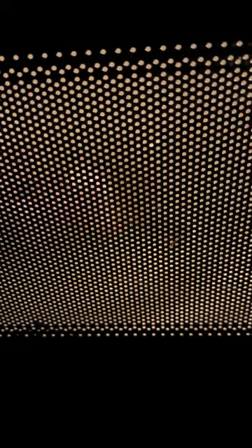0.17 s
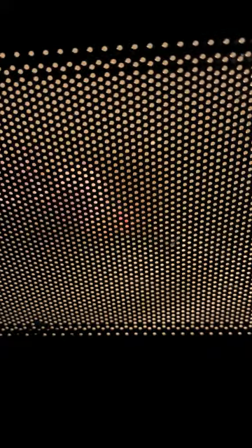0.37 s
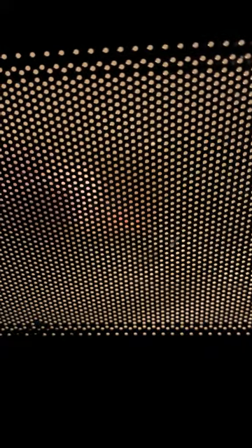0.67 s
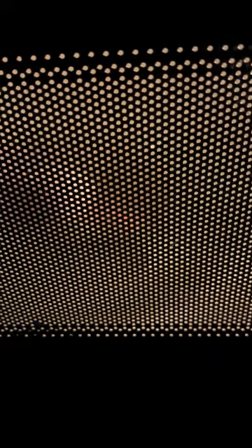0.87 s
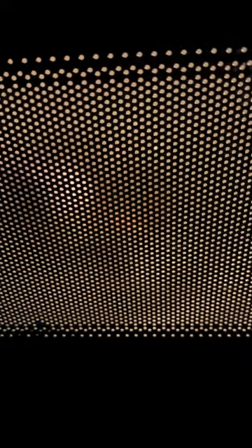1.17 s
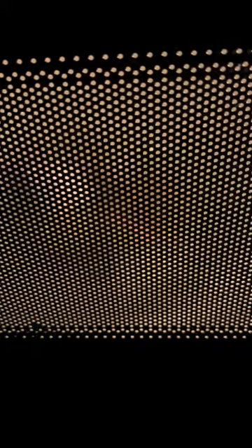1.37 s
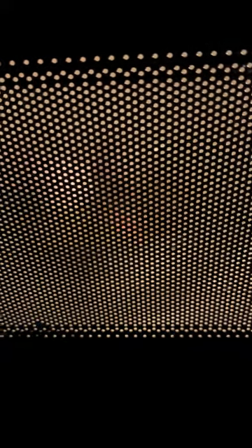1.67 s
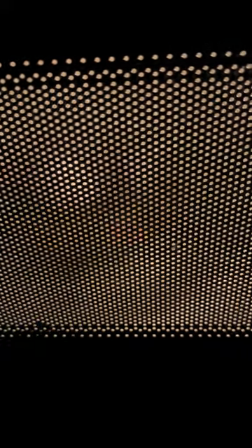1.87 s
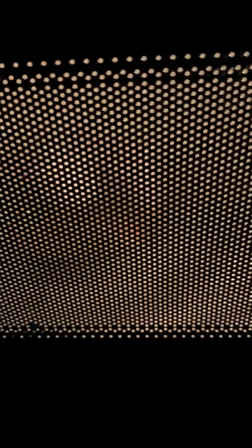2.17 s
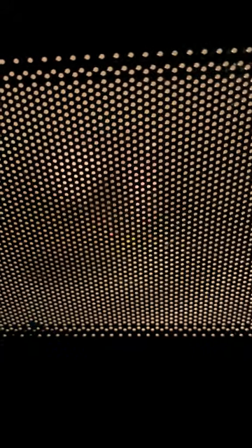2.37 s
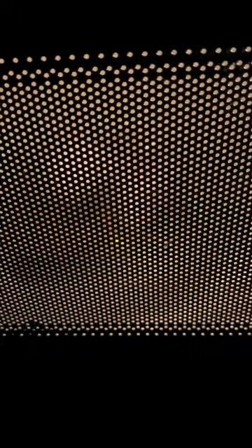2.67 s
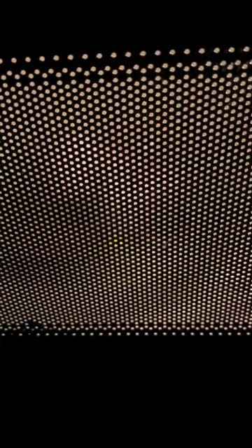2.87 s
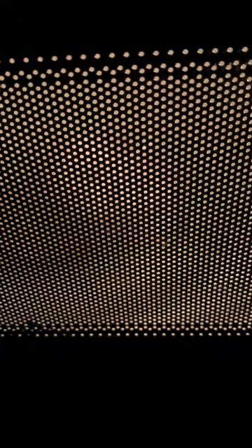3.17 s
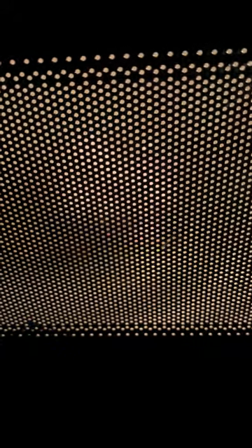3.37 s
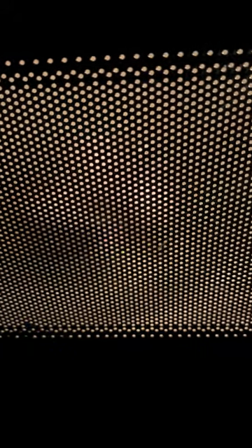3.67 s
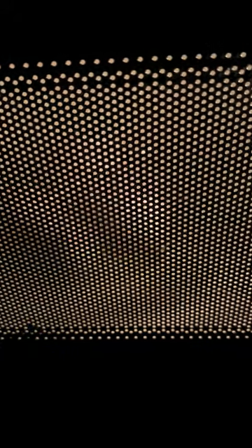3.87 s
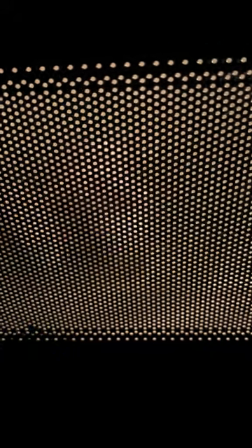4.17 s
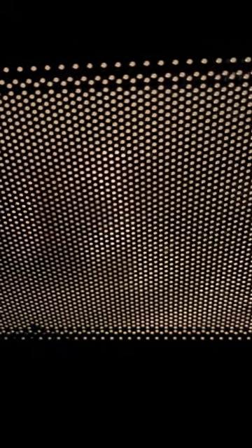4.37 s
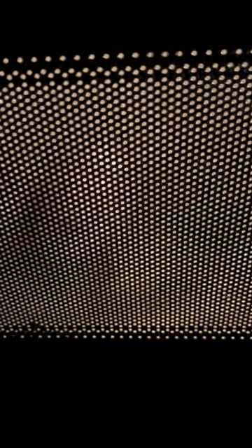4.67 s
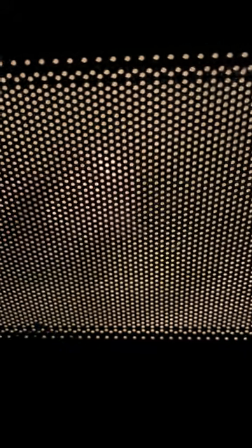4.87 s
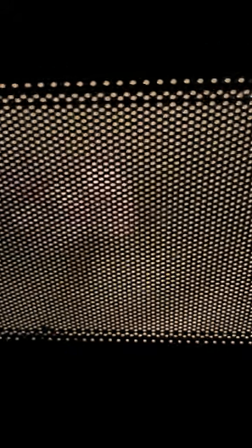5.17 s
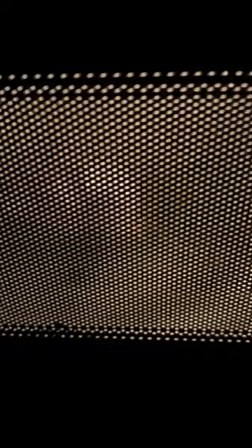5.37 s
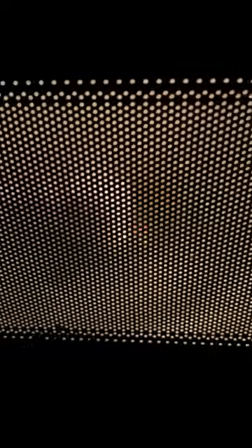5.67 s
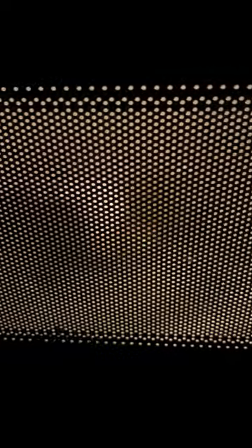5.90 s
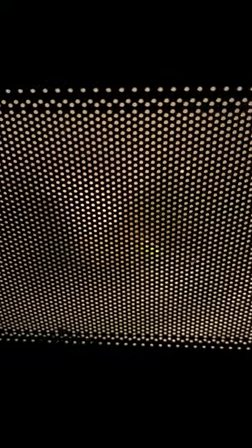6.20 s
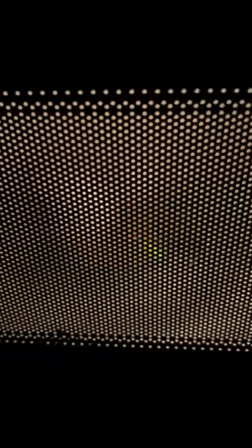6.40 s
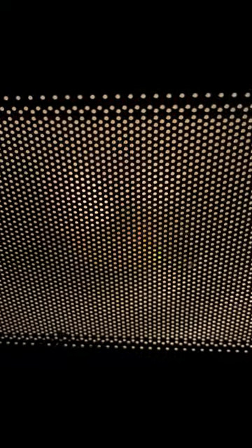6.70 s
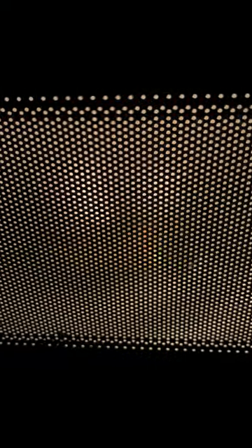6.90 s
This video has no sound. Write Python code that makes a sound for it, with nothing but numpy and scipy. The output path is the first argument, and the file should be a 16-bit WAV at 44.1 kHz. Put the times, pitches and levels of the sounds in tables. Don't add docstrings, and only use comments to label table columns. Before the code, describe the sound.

Close to a running microwave: low electrical hum that slowly grows, rushing fan air, scattered crackling pops from the food and faint dish ticks.

```python
import sys
import numpy as np
from scipy import signal
from scipy.fft import rfft, irfft
from scipy.io import wavfile
from scipy.ndimage import uniform_filter1d

SR = 44100
rng = np.random.default_rng(int(sys.argv[2]) if len(sys.argv) > 2 else 0)


def pcm_store(signal):
    levels = np.round(np.clip(np.atleast_2d(signal), -1, 1) * 32767)
    wavfile.write(sys.argv[1], SR, levels.astype(np.int16).T)


def voltage_ratio(decibels):
    exponent = np.asarray(decibels, float) / 20
    return 10 ** exponent


N = 310464
MAINS_HZ = 59.977


def curve(table, col=1):
    rows = np.array(table)
    return np.interp(np.arange(N) / SR, rows[:, 0], rows[:, col])


def along(table, hz):
    rows = np.array(table)
    return np.interp(np.log(hz + 1), np.log(rows[:, 0] + 1), rows[:, 1])


def walk(rate):
    hold = int(SR / rate)
    steps = np.repeat(rng.standard_normal(N // hold + 1), hold)
    return 1.3 * uniform_filter1d(uniform_filter1d(steps, hold), hold)[:N]


def colour(x, gain_db):
    size = x.shape[-1]
    return irfft(rfft(x) * voltage_ratio(gain_db(np.fft.rfftfreq(size, 1 / SR))), size)


def coloured_noise(table):
    x = colour(rng.standard_normal(N), lambda hz: along(table, hz))
    return x / np.sqrt(np.mean(x ** 2))


def tone(hz, level_db, pan_db=0, start=None):
    if start is None:
        start = rng.random()
    turns = np.cumsum(hz * np.ones(N)) / SR + start
    sides = voltage_ratio(np.array([[pan_db], [-pan_db]]) / 2)
    return np.sqrt(2) * np.sin(2 * np.pi * turns) * voltage_ratio(level_db) * sides


def swell(s, length, attack, release):
    t = np.arange(N) / SR - s
    return np.clip(t / attack, 0, 1) ** 2 * np.exp(-np.clip(t - length, 0, None) / release)


def flutter(level_db, lulls):
    t = np.arange(N) / SR
    half_width_s = .18
    dips = sum(db * np.exp(-2 * ((t - s) / half_width_s) ** 2) for s, db in lulls)
    return level_db + 1.5 * walk(6) - dips


# multiple of the mains, level in dB, left minus right in dB.
HUM = [(1, -55, 0), (7, -62, 6), (8, -49, 0), (12, -74, -6), (14, -63, 2), (15, -67, -5), (16, -66, -6),
       (17, -74, -5), (20, -68, -1), (21, -73, -1), (23, -67, -2), (25, -73, 2), (27, -72, -2),
       (28, -68, 0), (29, -72, -3), (30, -69, -1), (31, -80, -2), (34, -80, -5), (51, -81, 1)]
# time in seconds, level in dB.
PANEL_SHAKE = [(0, -50), (.4, -43.5), (1, -39), (2.2, -36), (3.2, -33.5), (4.7, -33.5), (6.2, -30.5),
               (7.04, -30)]
COUPLED = {2: (-48, -8), 4: (-64.5, -19)}
# time in seconds, depth in dB.
SIXTH_LULLS = [
    (0, 5.5),
    (2.12, 5),
    (4.3, 7),
    (5.12, 11.5),
    (5.76, 7),
]


def transformer():
    shake_db = curve(PANEL_SHAKE)
    levels = {3: shake_db, 6: flutter(-45.5, SIXTH_LULLS)}
    for k, (own_db, share_db) in COUPLED.items():
        levels[k] = 20 * np.log10(voltage_ratio(own_db) + voltage_ratio(shake_db + share_db))
    panel = sum(tone(k * MAINS_HZ, db, start=.22 * k + .6) for k, db in levels.items())
    hum = sum(tone(k * MAINS_HZ, db + 0.53 * walk(3.3), pan) for k, db, pan in HUM)
    buzz = sum(tone(k * MAINS_HZ, -84 - .2 * (k - 35) + 3.0 * rng.standard_normal()) for k in range(35, 80))
    return hum + panel + buzz


# time in seconds, turns a second.
SHAFT = [(0, 29.03), (.6, 29.13), (1.6, 29.09), (2.8, 29.04), (3.7, 29.06), (4.4, 29.16), (4.6, 29.12),
         (5.1, 29.19), (5.5, 29.07), (6, 29.24), (6.8, 29.19), (7.04, 29.22)]
WEAK_BLADE_TONES = {1: -72, 12: -58, 15: -64.5, 20: -63.5}
# pitch in Hz, wander in Hz, level in dB.
CASING = [(221.5, 0.33, -60), (658, 1.5, -60), (10850, 30, -103)]
# time in seconds, depth in dB.
BLADE_LULLS = [
    (.6, 5),
    (2.5, 8.1),
    (5.9, 14),
]
# time in seconds, depth in dB.
TWICE_LULLS = [
    (.47, 9.2),
    (.9, 7.8),
    (2.45, 4),
    (4.37, 5.4),
    (5.1, 3.7),
]


def fan():
    turns = curve(SHAFT) + 0.029 * walk(6)
    main = tone(5 * turns, flutter(-40.5, BLADE_LULLS)) + tone(10 * turns, flutter(-42.5, TWICE_LULLS))
    weak = sum(tone(k * turns, db + 2.4 * walk(5)) for k, db in WEAK_BLADE_TONES.items())
    casing = sum(tone(hz + wander * walk(5.4), db + 1.8 * walk(4.6)) for hz, wander, db in CASING)
    return main + weak + casing


# frequency in Hz, level in dB per Hz.
AIR = [(20, -98.5), (32, -77.5), (48, -64.5), (75, -59), (165, -61), (200, -70.5), (480, -70), (540, -76.5),
       (1650, -81.5), (2250, -91), (3700, -99.5), (5000, -106), (5500, -116), (9000, -150)]
# frequency in Hz, width in Hz, gain in dB.
DUCT = [(258, 9.7, 4), (298, 41, 6), (318, 12, -4.5), (410, 22, -3), (863, 140, 2), (1340, 110, 2),
        (1434, 69, -6.5), (1464, 55, 3), (2800, 410, -2.5), (2900, 140, -0.5), (3950, 250, -12),
        (4880, 1000, 5.5)]
# frequency in Hz, likeness 0-1.
ALIKE = [(150, .999), (200, .97), (450, .86), (600, .55), (750, .2), (900, .55), (1100, .45), (1300, .85),
         (1700, .78), (2200, .42), (2800, .38), (3600, .68), (4200, .94), (4700, .988)]


def air():
    modes = rng.standard_normal(400)

    def shape_db(hz):
        mode_db = np.interp(hz, np.linspace(0, SR / 2, len(modes)), modes)
        box_db = 1.8 * np.clip(hz / 2500, 0, 1) * mode_db
        duct_db = sum(db / (1 + (2 * (hz - f) / width) ** 2) for f, width, db in DUCT)
        return along(AIR, hz) + box_db + duct_db

    throb_db = .45 * np.sin(4 * np.pi * MAINS_HZ * np.arange(N) / SR)
    level = np.sqrt(SR / 2) * voltage_ratio(.3 * walk(3) + throb_db)
    shared, left, right = rng.standard_normal((3, N)) * level
    like = np.clip(along(ALIKE, np.fft.rfftfreq(N, 1 / SR)), 0, 1)
    both = np.sqrt(like) * rfft(shared) + np.sqrt(1 - like) * rfft(np.array([left, right]))
    return colour(irfft(both, N), shape_db)


# start in seconds, length in seconds, rustle level in dB, sizzle level in dB.
DRAGS = [
    (3.9, .1, -74, -76),
    (5.58, .12, -67, -86),
    (6.8, .19, -66, -85),
]


def drags(column):
    return sum(voltage_ratio(row[column]) * swell(row[0], row[1], .08, .06) for row in DRAGS)


def rustle():
    rub = colour(rng.standard_normal(N), lambda hz: -30.0 * np.log2((hz + 1) / 3300) ** 2)
    rub = rub / np.sqrt(np.mean(rub ** 2))
    return (voltage_ratio(-85.5) + drags(2)) * voltage_ratio(2.3 * walk(37)) * rub


# frequency in Hz, gain in dB.
FIZZ = [(1500, -8), (4000, 4), (5600, 1.5), (7000, 3), (8200, -0.5), (9600, -1), (10400, -1), (11000, -1),
        (11700, -3.5), (13000, -5.5), (15700, -7.5)]


def sizzle():
    moisture = voltage_ratio(-85) * swell(3.5, .1, .1, 2.2)
    level = voltage_ratio(-80) + moisture + drags(3)
    return level * voltage_ratio(.8 * walk(20)) * coloured_noise(FIZZ)


def ring(t60, level_db, tilt_db, thud_db):
    t = np.arange(SR // 2) / SR

    def fall(t60):
        onset = 1 - .3 * np.exp(-t / (0.0089 * t60))
        slow_tail = voltage_ratio(-39.0) * voltage_ratio(-60 * t / .4)
        return onset * voltage_ratio(-60 * t / t60) + slow_tail

    def slope(hz):
        return level_db + tilt_db * np.log2(hz / 9300)

    low_db = slope(6200) + thud_db
    shape = [(1000, low_db - 9), (2300, low_db - 0.5), (3300, low_db), (6200, slope(6200)),
             (9700, slope(9700)), (14000, slope(14000))]
    bumps, lines = rng.standard_normal(40), rng.standard_normal(600)

    def burst_db(hz):
        broad_db = 1.3 * np.interp(hz, np.linspace(0, SR / 2, len(bumps)), bumps)
        narrow_db = 5.6 * np.interp(hz, np.linspace(0, SR / 2, len(lines)), lines)
        return along(shape, hz) + broad_db + narrow_db

    burst = colour(rng.standard_normal(len(t)), burst_db)
    body = colour(burst, lambda hz: -10 * np.log10(1 + (hz / 11500) ** 8))
    treble = burst - body
    return voltage_ratio(-1.5) * np.sqrt(SR / 2000) * (body * fall(t60) + treble * fall(.85 * t60))


# start in seconds, level in dB per kHz, tilt in dB an octave, thud in dB over the slope.
POPS = [(0.037, -65, -2.5, 6.5), (0.0513, -60.5, -6, 10), (0.1341, -79, 4.5, -6.5),
        (0.4664, -81.5, -8.5, -4), (0.4865, -73, 4.5, -5), (0.7682, -84.5, -5, -5), (0.917, -59, 1.5, 0),
        (1.034, -70, 3, -4), (1.0519, -50, -4.5, -3), (1.1347, -67, -1.5, -8.5), (1.3507, -58.5, 1, 1.5),
        (1.603, -70, -20.5, 3), (2.618, -77, 7.5, -6.5), (3.0503, -74.5, 4.5, 16.5), (3.2663, -77.5, 3, -6),
        (4.102, -68.5, -2, -3), (4.502, -59, -9, 6.5), (4.603, -75, -0.5, -8.5), (4.619, -53, -2.5, -3.5),
        (4.8694, -75.5, -11.5, 0), (5.0361, -59, -3.5, -0.5), (5.2537, -76, -20, 5),
        (5.3025, -78, 2.5, -2.5), (5.4851, -53.5, -2, -0.5), (6.019, -74, -5, -2.5), (6.086, -54, -1, -7),
        (6.1014, -52.5, -2.5, 1.5), (6.8034, -91.5, -13, 22)]


def pops():
    out = np.zeros(N + SR)
    for s, db, tilt_db, thud_db in POPS:
        t60 = 0.12 + 0.0018 * (db + 65.5)
        out[int(s * SR):][:SR // 2] += ring(t60, db, tilt_db, thud_db)
    return out[:N]


# start in seconds, level in dB per kHz, tilt in dB an octave, thud in dB over the slope.
SNAPS = [
    (2.469, -80.5, 5, -1),
    (2.484, -86, -12, 24.5),
    (2.5649, -83.5, 1, -7.5),
    (3.7192, -70.5, -2.5, -5),
    (3.739, -70, -1.5, 11),
    (3.7518, -61.5, 7, 9.5),
    (3.776, -67, -1.5, 12),
    (5.455, -84, -23, 12.5),
    (6.149, -79, -8, 13),
]


def snaps():
    out = np.zeros(N + SR)
    for s, db, tilt_db, thud_db in SNAPS:
        out[int(s * SR):][:SR // 2] += ring(0.042, db, tilt_db, thud_db)
    return out[:N]


# start in seconds, pitch in Hz, peak in dB, time to fall 60 dB in seconds.
TICKS = [
    (2.482, 2900, -45.5, .03),
    (3.05, 3620, -57, .03),
    (5.455, 3480, -52.5, .04),
    (6.15, 2700, -46, .04),
    (6.803, 2800, -52.5, .04),
]


def ticks():
    t = np.arange(N) / SR
    out = np.zeros(N)
    for s, hz, db, t60 in TICKS:
        fade = voltage_ratio(db - 60 * np.abs(t - s) / t60)
        out += (t > s) * fade * np.sin(2 * np.pi * hz * (t - s))
    return out


# frequency in Hz, gain in dB.
DOOR = [(1500, -7), (3500, 6), (6000, -0.5), (7200, -11), (8500, 2.5), (10800, -5.5), (12500, 3),
        (15700, -4.5)]
# start in seconds, length in seconds, level in dB.
STEAM = [
    (3.718, 0.065, -65),
    (3.774, .045, -57.5),
]


def steam():
    spurt = sum(voltage_ratio(db) * swell(s, length, .014, .006) for s, length, db in STEAM)
    return spurt * voltage_ratio(1.6 * walk(150)) * coloured_noise(DOOR)


def scene():
    dish = rustle() + ticks()
    food = sizzle() + pops() + snaps() + steam()
    return transformer() + fan() + air() + dish + food


# frequency in Hz, lead in radians.
LEAD = [(0, 0.1), (120, 0.04), (180, -.2), (300, -.4), (500, -.2), (680, -1), (780, 0), (880, 0.01),
        (1000, 1), (1200, 0), (1500, -.1), (1800, 0), (2400, 2.5), (3500, 1.56), (4100, 2.23)]
# frequency in Hz, left minus right in dB.
SIDEWAYS = [(60, .3), (250, .6), (500, -.6), (2500, -.8), (4500, 0)]


def microphone_ports(dry):
    opposed_hz, port_lag_s, top_hz = 4700, .000235, 15780
    margin = 4096
    wide = np.pad(dry, ((0, 0), (margin, margin)), mode="reflect", reflect_type="odd")
    hz = np.fft.rfftfreq(wide.shape[1], 1 / SR)
    lag = np.pi + 2 * np.pi * port_lag_s * (hz - opposed_hz)
    lag -= 0.15 * np.sin(lag)
    lead = np.where(hz < opposed_hz, along(LEAD + [(opposed_hz, np.pi)], hz), lag)
    left = voltage_ratio(along(SIDEWAYS, hz) / 2) * np.exp(.5j * lead)
    ports = irfft(rfft(wide) * (hz < top_hz) * np.array([left, 1 / left]), wide.shape[1])
    return ports[:, margin:-margin]


def band_limit(x):
    return signal.sosfilt(signal.butter(12, 16710, fs=SR, output="sos"), x)


def record(dry):
    mix = microphone_ports(dry)
    return band_limit(mix)


dry = scene()
out = record(dry)
pcm_store(out)
```